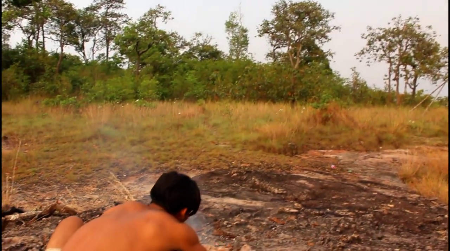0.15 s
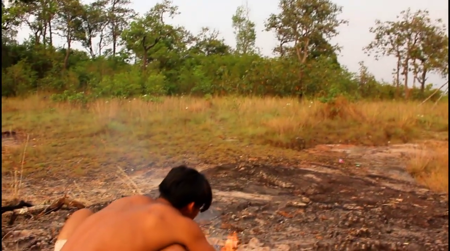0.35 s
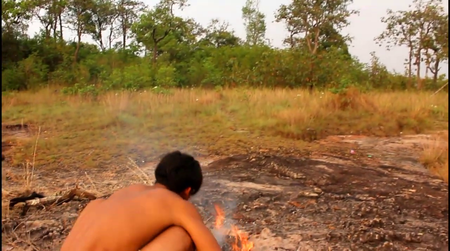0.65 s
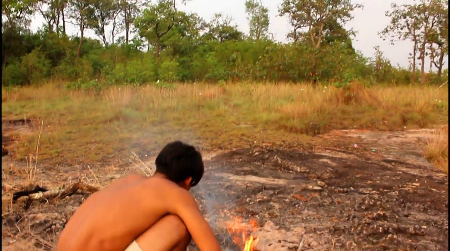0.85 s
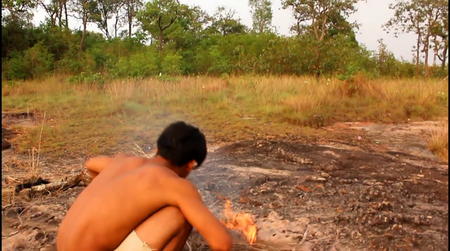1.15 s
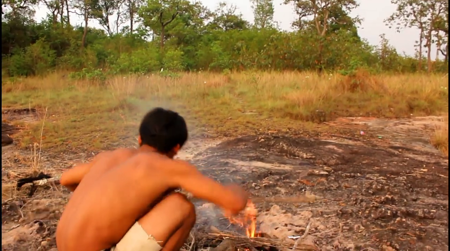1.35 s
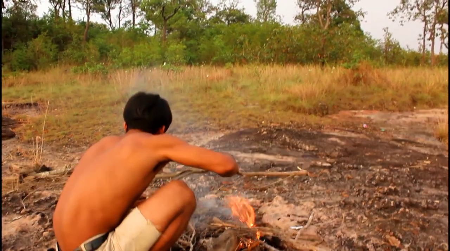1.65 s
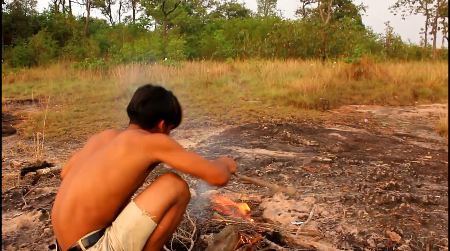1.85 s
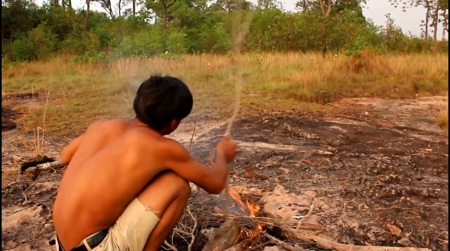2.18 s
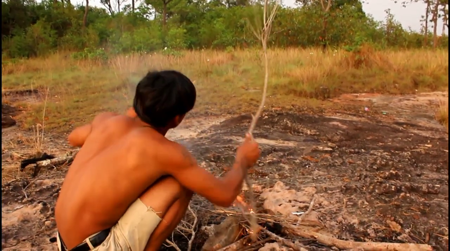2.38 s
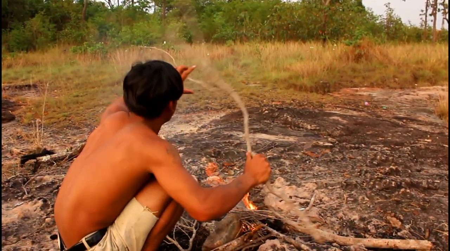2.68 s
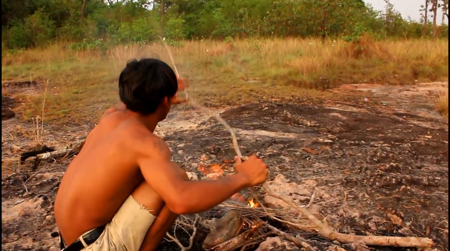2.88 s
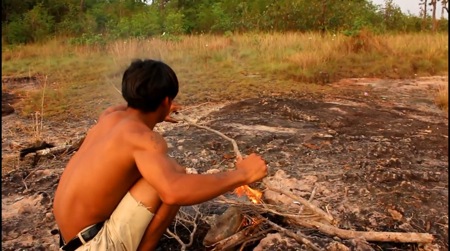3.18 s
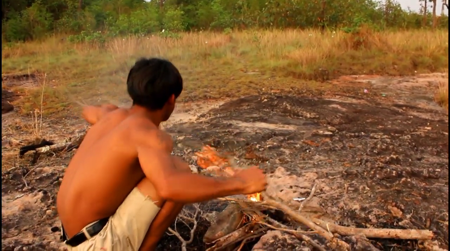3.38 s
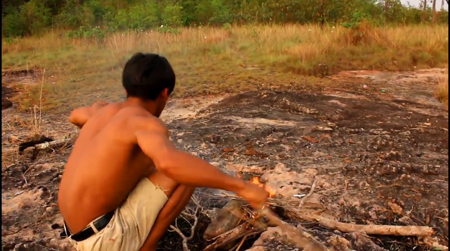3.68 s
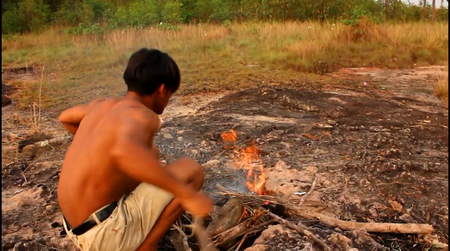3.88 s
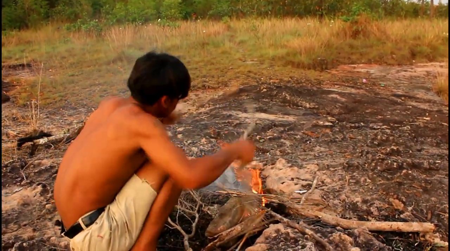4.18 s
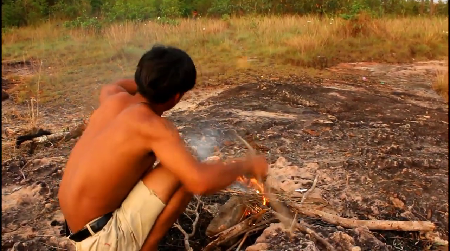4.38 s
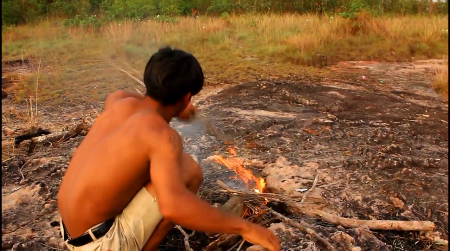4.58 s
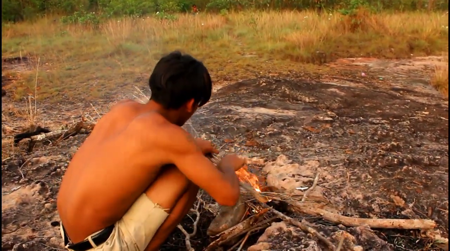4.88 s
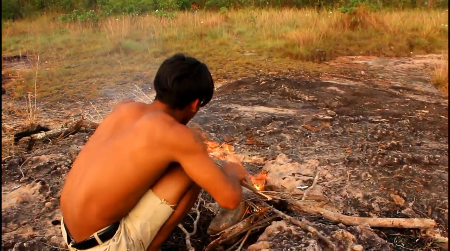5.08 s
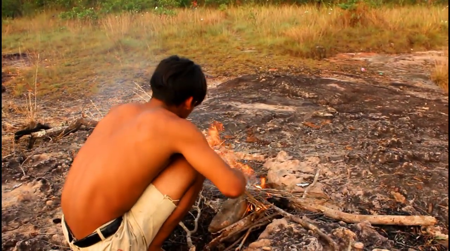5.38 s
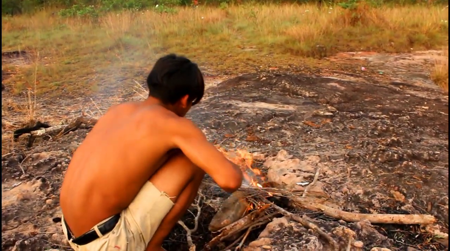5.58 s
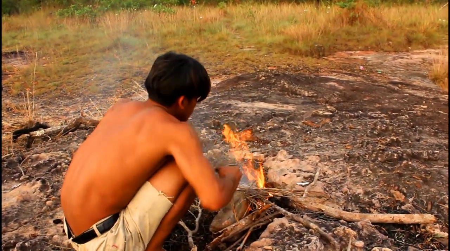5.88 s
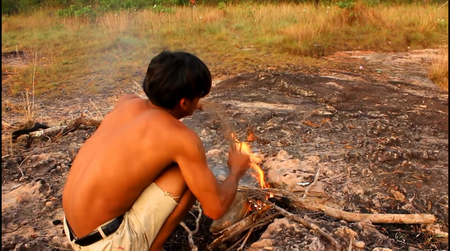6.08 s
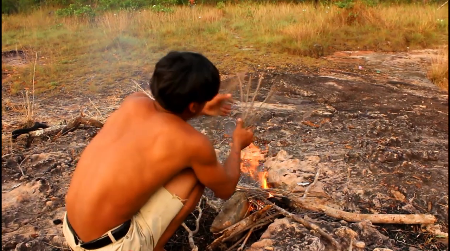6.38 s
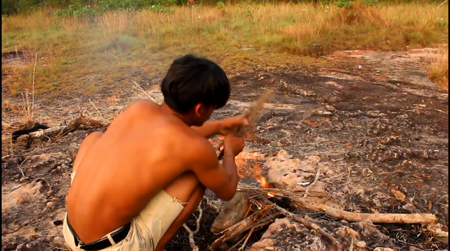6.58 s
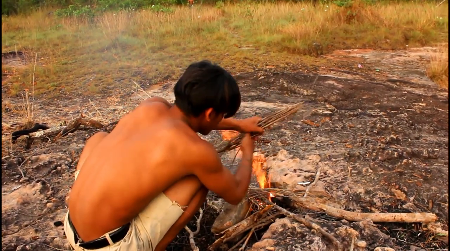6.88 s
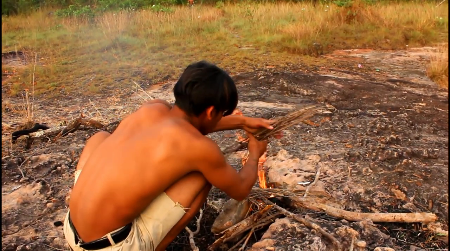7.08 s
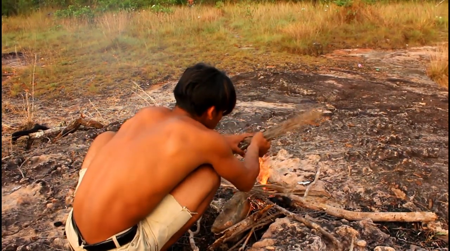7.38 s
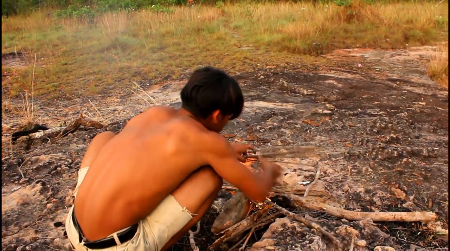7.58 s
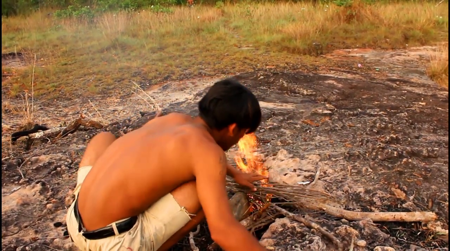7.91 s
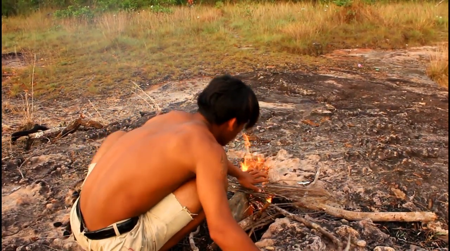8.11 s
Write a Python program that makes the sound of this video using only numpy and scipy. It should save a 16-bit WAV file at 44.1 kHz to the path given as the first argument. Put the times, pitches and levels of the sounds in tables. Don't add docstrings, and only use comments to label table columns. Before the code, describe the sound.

Close to the microphone in an open clearing, dry grass rustles in short scratchy strokes as burning blades tick, spit and fizz throughout. The first second is light crackle and rustle; around 1.3 s a thin, faint hiss of steam rises and fades. A crisp twig snap lands near 2 s, followed by smaller clicks and rustles, with a low wind thump at 3.2 s. At 3.9-4.0 s come splintering and two very loud, deep cracks, then a hollow branch split with knocks and wood dragging at 4.7-4.9 s. Rustling and small pops continue until a bright, hard splintering burst at 6.2 s, then lesser snaps and pings to 6.9 s. Grass swishes and flares carry on to the end past 8 s, with wind bumps near 7.3 and 8.2 s. Far off, a bird gives a quick high falling-note trill about every second, over steady faint insect hiss and a few very soft low dove coos before 4.4 s.

```python
import sys
import numpy as np
from scipy import signal
from scipy.io import wavfile
from scipy.ndimage import uniform_filter1d

SR = 44100
rng = np.random.default_rng(int(sys.argv[2]) if len(sys.argv) > 2 else 0)


def magnitude_from_level(level_db):
    exponent = np.asarray(level_db, float) / 20
    return 10 ** exponent


def bounce(signal):
    frames = np.transpose(np.atleast_2d(signal))
    limited = np.clip(frames, -1, 1)
    pcm = np.round(limited * 32767).astype(np.int16)
    wavfile.write(sys.argv[1], SR, pcm)


N = 363825


def evened(x):
    return x / np.sqrt(np.mean(x ** 2) + 1e-20)


def peaked(x):
    return x / np.sqrt(uniform_filter1d(x ** 2, 80).max())


def add(mix, start_s, sound):
    part = mix[max(round(start_s * SR), 0):][:len(sound)]
    part += sound[:len(part)]


def band(x, lo_hz, hi_hz, order=2):
    sos = signal.butter(order, [lo_hz, min(hi_hz, SR / 2.2)], "band", fs=SR, output="sos")
    return signal.sosfilt(sos, x)


def ring(x, hz, width_hz):
    r = np.exp(-np.pi * width_hz / SR)
    return signal.lfilter([1, 0, -1], [1, -2 * r * np.cos(2 * np.pi * hz / SR), r * r], x)


def drift(size):
    return evened(uniform_filter1d(uniform_filter1d(rng.standard_normal(N), size), size))


# frequency in Hz, density in dB per Hz.
AIR_SPECTRUM = [(12, -35), (20, -8), (70, 4.5), (140, 3), (219, 2), (504, -7), (856, -10), (1130, -11),
                (2030, -13), (4300, -15), (6170, -13), (7090, -24), (9900, -26), (13800, -38), (15400, -39)]


def air(level_db=-50):
    frames, hz = N // 256 + 5, np.fft.rfftfreq(1024, 1 / SR)
    real, imag, patches = rng.standard_normal((frames, 513, 3)).T
    patches_db = 1.4 * evened(uniform_filter1d(uniform_filter1d(patches, 10, 0), 10, 1))
    flutter_db = 3.4 * evened(uniform_filter1d(rng.standard_normal(frames), 6))
    f, db = np.transpose(AIR_SPECTRUM)
    colour_db = np.interp(np.log(hz + 1), np.log(f + 1), db)[:, None]
    bass = 1 / (1 + (hz[:, None] / 220) ** 2)
    spectra = (real + 1j * imag) * magnitude_from_level(colour_db + patches_db + bass * flutter_db)
    return magnitude_from_level(level_db) * evened(signal.istft(spectra, nperseg=1024, noverlap=768)[1][:N])


def insects(hz=6340, width_hz=610, level_db=-72.5):
    hiss = ring(rng.standard_normal(N), hz, width_hz)
    return magnitude_from_level(level_db) * evened(ring(hiss, hz, width_hz))


def swells(rows):
    t = np.arange(0, N, 32) / SR
    power = np.zeros(len(t))
    for peak_s, db, rise_s, fall_s in rows:
        drop_db = 10 * np.maximum((peak_s - t) / rise_s, (t - peak_s) / fall_s)
        power += magnitude_from_level(db - drop_db) ** 2
    return np.interp(np.arange(N) / SR, t, np.sqrt(power))


# peak in seconds, level in dB, seconds to rise 10 dB, to fall 10 dB.
STROKES = [(0, -38.5, .05, 0.14), (.873, -40, 0.02, 0.12), (1.043, -43.5, 0.07, .25), (1.33, -43, .12, .3),
           (1.98, -37, 0.12, .13), (2.282, -43.5, 0.06, .1), (2.6, -51, .2, .1), (2.91, -37.5, .06, .13),
           (3.09, -42.5, 0.06, .2), (3.385, -45, .15, .09), (3.625, -42, .015, 0.14),
           (3.91, -39, .18, 0.22), (4.141, -37, 0.1, 0.12), (4.225, -36, .12, 0.08), (4.742, -35, 0, 0.04),
           (5.036, -40, 0.05, 0.47), (5.45, -42, .4, .3), (5.88, -46, .5, 0.1), (6.204, -26, .005, .015),
           (6.255, -38, .015, 0.08), (6.356, -42.5, .05, 0.1), (6.54, -35, .1, 0.07),
           (6.7, -36.5, .037, 0.14), (6.95, -47.5, 0.1, 0.14), (7.129, -46, .08, .1),
           (7.421, -41, 0.05, .09), (7.575, -41.5, .1, .06), (7.93, -41, 0.12, .07),
           (8.165, -39.5, .07, .3)]
# peak in seconds, level in dB, seconds to rise 10 dB, to fall 10 dB.
FLARES = [(0, -52, .05, 0.045), (.808, -49, .1, .1), (1.043, -40, 0.044, 0.091), (1.424, -40.5, .012, 0.06),
          (1.69, -39, .03, .04), (2.86, -44, .06, .05), (2.282, -38.5, .03, 0.076), (2.457, -46, .15, .12),
          (3.97, -41, .05, .3), (4.155, -36, .1, .15), (5.06, -42, .05, .22), (5.45, -49, .3, .04),
          (5.92, -47, .2, .04), (6.079, -49, .1, .045), (6.345, -40, .03, .037), (6.54, -35, .07, .055),
          (6.7, -42, .045, .1), (7.129, -37, 0.033, 0.084), (7.54, -44, .06, .08), (7.92, -38, .05, .07),
          (8.154, -44, 0.037, .03)]
# peak in seconds, level in dB, seconds to rise 10 dB, to fall 10 dB.
DRAGS = [(.15, -46, .3, .3), (.873, -48, .02, 0.018), (4.31, -34, .04, .06), (4.742, -33, 0.0072, .02),
         (4.83, -36.5, 0.046, 0.068), (6.19, -28.5, .003, .007), (5.15, -49, .1, .1), (7.27, -54, 0.34, .3),
         (7.421, -42, 0.045, 0.083), (7.897, -45, .04, 0.14)]
# start in seconds, length in seconds, level in dB.
SWIPES = [(0.864, 0.033, -43.5), (1.883, .06, -39), (5.184, 0.026, -35), (7.095, .085, -47),
          (7.385, 0.1, -39), (7.835, 0.15, -42.5)]


def grass(snaps_per_s=600, spread_db=3.5, clump_db=1.0, stalk_count=28):
    body = swells(STROKES)
    wood = np.hypot(swells(DRAGS), magnitude_from_level(-15) * body)
    fizz = np.hypot(swells(FLARES), magnitude_from_level(-21) * body)
    swipes = np.zeros(N)
    for start_s, length_s, db in SWIPES:
        add(swipes, start_s, magnitude_from_level(db) * signal.windows.tukey(round(length_s * SR), .25))

    clumps = magnitude_from_level(clump_db * drift(size=300))
    sizes = magnitude_from_level(spread_db * np.minimum(rng.exponential(1, N), 4))
    hits = sizes * (rng.random(N) < snaps_per_s * clumps / SR)
    puffs = signal.lfilter([1], [1, -np.exp(-1 / (0.0018 * SR))], hits)
    grains = evened((evened(puffs) + 0.7) * clumps * rng.standard_normal(N))

    touch = evened(uniform_filter1d(rng.standard_normal((stalk_count, N // 441 + 1)), 5, 1))
    touched = magnitude_from_level(4.5 * touch).repeat(441, 1)[:, :N]
    stalks_hz = np.geomspace(2000, 8000, stalk_count)
    stalks = sum(evened(ring(grains * on, hz, 95)) for on, hz in zip(touched, stalks_hz))

    scrape = evened(band(grains, 2300, 6500)) + magnitude_from_level(1.5) * evened(stalks)
    hollow = ring(band(grains, 620, 1050), hz=840, width_hz=170)
    crisp = band(band(grains, 5800, 15500), 3000, 6500, order=1)
    out = magnitude_from_level(-4.5) * np.hypot(body, swipes) * evened(scrape)
    out += magnitude_from_level(-5.0) * wood * evened(hollow)
    return out + magnitude_from_level(-11.5) * np.hypot(fizz, 0.51 * swipes) * evened(crisp)


def ticks(ticks_per_s=260, level_db=-21, t60_s=.012, ember_db=-53, blade_count=12):
    sizes = magnitude_from_level(3.8 * np.minimum(rng.exponential(1, N), 4)) * (rng.random(N) < ticks_per_s / SR)
    blade = rng.integers(0, blade_count, N)
    t, out = np.arange(1500) / SR, np.zeros(N)
    for k, hz in enumerate(np.geomspace(2500, 6500, blade_count)):
        tick = band(rng.standard_normal(len(t)) * magnitude_from_level(-60 * t / t60_s), 0.69 * hz, 1.48 * hz)
        out += signal.oaconvolve(sizes * (blade == k), tick)[:N]
    stirred = magnitude_from_level(ember_db) + np.hypot(swells(STROKES), swells(FLARES))
    return magnitude_from_level(level_db) * stirred * evened(out)


def crackle(rows, t60_s, wide):
    out, t = np.zeros(N), np.arange(2000) / SR
    for (peak_s, db, hz), noise in zip(rows, rng.standard_normal((len(rows), len(t)))):
        puff = noise * (1 - np.exp(-t / .0004)) * magnitude_from_level(-60 * t / t60_s)
        tick = peaked(band(puff, hz / wide, hz * wide)) + .6 * peaked(ring(puff, hz, .08 * hz))
        add(out, peak_s - .0006, magnitude_from_level(db) * peaked(tick))
    return out


# time in seconds, peak in dB, ring in Hz.
SPARKS = [(0.0454, -44.0, 7900), (0.7683, -56.0, 7750), (0.9072, -47.5, 7390), (1.0265, -45.5, 7900),
          (1.0335, -44.0, 8070), (1.0993, -48.0, 7020), (1.5074, -46.5, 8630), (1.6947, -45.5, 9020),
          (1.7331, -51.5, 8050), (1.7456, -47.0, 8330), (1.8052, -51.0, 8550), (1.8444, -51.5, 8050),
          (2.0519, -50.0, 8120), (2.3497, -50.5, 8590), (2.4423, -52.5, 7750), (2.4475, -52.5, 7190),
          (2.4764, -53.0, 8590), (2.5084, -52.0, 8830), (2.5288, -49.0, 11300), (2.8042, -51.5, 7320),
          (3.0918, -42.0, 8510), (3.2971, -54.5, 9880), (3.3736, -47.0, 7770), (3.772, -51.0, 8140),
          (3.8106, -49.0, 7450), (3.8655, -46.5, 10120), (3.9511, -15.5, 7490), (4.3956, -53.5, 9370),
          (4.513, -50.0, 8100), (4.7942, -26.0, 8310), (4.9825, -42.0, 8250), (5.4142, -45.5, 7020),
          (5.514, -42.5, 8660), (5.7699, -49.5, 7130), (5.8615, -48.5, 8590), (5.9218, -49.5, 8570),
          (6.0411, -49.5, 9880), (6.2037, -20.0, 7970), (6.2823, -41.5, 9650), (6.3806, -43.5, 7820),
          (6.4402, -49.5, 7840), (6.4501, -34.5, 10510), (6.6507, -52.5, 9710), (6.7871, -41.0, 7210),
          (6.9188, -49.5, 7430), (6.9685, -45.5, 7970), (7.176, -47.5, 12420), (7.2588, -48.0, 7860),
          (7.4726, -44.5, 8940), (7.5459, -43.5, 7920), (7.6282, -49.0, 10010), (7.7387, -54.0, 8380),
          (7.7901, -48.0, 8310), (7.8208, -53.0, 7040), (8.0515, -52.0, 9540), (8.0899, -53.5, 8910),
          (8.1308, -43.5, 9280), (8.156, -43.0, 8870)]


def sparks():
    return crackle(SPARKS, t60_s=.02, wide=1.75)


# time in seconds, peak in dB, ring in Hz.
STALKS = [(0.0459, -33.0, 2050), (0.3136, -45.5, 3900), (0.338, -49.5, 3060), (1.034, -44.0, 3250),
          (1.4136, -42.0, 2780), (1.4276, -43.0, 3900), (1.5593, -50.0, 3900), (2.0521, -45.0, 3790),
          (2.3021, -46.0, 3830), (2.3507, -50.0, 2820), (2.5572, -50.0, 3900), (2.5862, -48.5, 3900),
          (2.6346, -49.0, 3140), (2.9167, -33.5, 3570), (2.9466, -40.5, 2910), (3.0713, -41.5, 3900),
          (3.0803, -40.5, 3060), (3.2841, -41.5, 3700), (3.2966, -42.0, 3270), (3.3741, -43.5, 3060),
          (3.55, -48.5, 1850), (3.6325, -41.0, 2840), (3.6453, -42.5, 3420), (3.7134, -43.0, 2410),
          (3.7722, -46.5, 2560), (3.961, -23.0, 3620), (4.1451, -25.5, 3900), (4.3175, -43.0, 3530),
          (4.5767, -51.5, 2710), (4.6517, -53.0, 3340), (4.7385, -31.0, 3100), (5.1089, -41.0, 3680),
          (5.4137, -41.5, 3750), (5.5821, -43.5, 2650), (5.6417, -41.5, 3550), (5.6477, -43.5, 2800),
          (5.7011, -44.0, 2280), (5.7203, -42.0, 3550), (5.863, -45.5, 2970), (5.9211, -45.0, 3470),
          (6.0413, -46.5, 1890), (6.3486, -42.5, 3550), (6.3663, -39.0, 3550), (6.4883, -36.0, 2200),
          (6.8562, -39.5, 2200), (6.9428, -45.0, 2370), (7.2167, -49.0, 3040), (7.2586, -50.5, 3900),
          (7.4117, -33.5, 2280), (7.4708, -40.5, 2970), (7.4793, -42.5, 3040), (7.5858, -38.0, 3790),
          (7.628, -46.0, 2450), (7.6352, -47.5, 2370), (7.739, -46.0, 2990), (7.8764, -39.5, 2450),
          (8.0827, -47.0, 3900), (8.157, -42.0, 2430)]


def stalk_clicks():
    return crackle(STALKS, t60_s=.028, wide=1.9)


# frequency in Hz, width in Hz, level in dB.
BRANCH_MODES = [
    (304, 87, -14),
    (867, 250, 7.5),
    (1608, 110, 4),
]


def crack(db, hz, t60_s, noise, fibres, thump_db, knock_db, edge_db, rise_s, tear_db):
    t = np.arange(len(noise)) / SR
    burst = magnitude_from_level(-60 * (t / t60_s) ** 0.8) + magnitude_from_level(-35.5 - 60 * t / (0.53 * t60_s + 0.0244))
    onset = 1 - np.exp(-(t / rise_s) ** 1.3)
    tears = noise * (0.51 + uniform_filter1d(fibres ** 6, 24) * 4.9) * onset * burst

    body = band(tears, max(.5 * hz, 1700), 1.3 * hz + 1500)
    others_hz = np.minimum(hz * (.6 + fibres[:4]), 12000)
    scatter = sum(ring(tears, f, 150 + .05 * f) for f in others_hz)
    tone = ring(tears, hz, 110 + .03 * hz) + .45 * magnitude_from_level(tear_db) * scatter
    thump = band(band(tears, 600, 2100, order=1), 350, 9000, order=1)
    knock = sum(magnitude_from_level(g) * peaked(ring(tears, f, w)) for f, w, g in BRANCH_MODES)
    edge = band(band(tears, 6000, 15500), 3000, 7500, order=1)
    edge = edge * magnitude_from_level(np.maximum(-60 * .25 * t / t60_s, -12))

    mix = np.interp(db, [-35, -10], [.4, .9]) * magnitude_from_level(tear_db) * peaked(body)
    mix = mix + np.interp(db, [-35, -10], [.85, .4]) * peaked(tone)
    mix = mix + magnitude_from_level(thump_db) * peaked(thump)
    mix = mix + magnitude_from_level(knock_db - 0.5) * peaked(band(knock, 200, 2300))
    return magnitude_from_level(db) * (mix + magnitude_from_level(edge_db - 0.5) * peaked(edge))


def wood(rows, thump_db, knock_db, edge_db, rise_s=.0005, tear_db=0):
    out = np.zeros(N)
    noises, fibres = rng.standard_normal((len(rows), 5000)), rng.random((len(rows), 5000))
    for (peak_s, db, hz, t60_s), noise, fibre in zip(rows, noises, fibres):
        sound = crack(db, hz, t60_s, noise, fibre, thump_db, knock_db, edge_db, rise_s, tear_db)
        add(out, peak_s - .0006, sound)
    return out


# time in seconds, peak in dB, ring in Hz, t60 in seconds.
BREAKS = [(.047, -35, 2070, 0.011), (.123, -43, 3830, .046), (.1826, -42, 6550, 0.023),
          (.3676, -43, 2000, .04), (.955, -40, 1430, .056), (.9611, -35.5, 3240, 0.046),
          (2.6908, -39, 2870, .064), (4.127, -27, 3630, .03), (4.2891, -39, 6070, .038),
          (4.5002, -42, 2510, .03), (4.7927, -14, 2260, .05), (4.9812, -30, 2500, 0.046),
          (5.0198, -32.5, 5630, 0.12), (5.1293, -38.5, 4250, 0.048), (7.4117, -39, 2340, .12),
          (7.875, -39, 1490, 0.068), (8.2154, -32.5, 2480, .023)]


def breaks():
    return wood(BREAKS, thump_db=-20, knock_db=-3, edge_db=-24)


# centre in seconds, level in dB, wobble in Hz, length in seconds.
GUSTS = [(0.417, -41, 83.5, 0.016), (0.454, -39, 68.5, 0.017), (0.765, -38.5, 96, 0.016),
         (2.602, -41.5, 108, 0.013), (2.648, -45, 58, 0.12), (3.106, -41, 62.6, 0.025),
         (3.192, -31.5, 86, 0.034), (3.239, -20, 135, 0.022), (3.296, -27.5, 97, 0.021),
         (3.467, -42.5, 61.3, 0.035), (3.605, -44, 99, 0.028), (4.13, -41.5, 232, 0.0088),
         (4.212, -36.5, 76, 0.016), (4.443, -35.5, 69.4, 0.038), (4.582, -32, 64, 0.0066),
         (4.603, -41, 69, 0.01), (4.802, -38, 222, 0.014), (5.296, -43, 66, 0.093),
         (6.149, -37.5, 78, 0.011), (6.727, -44, 115, 0.027), (6.956, -32.5, 92, 0.019),
         (7.015, -41, 74.6, 0.032), (7.111, -41, 52.3, 0.01), (7.157, -41, 71.4, 0.046),
         (7.266, -25.5, 89, 0.027), (7.503, -37, 55, 0.069), (7.571, -41.5, 55, 0.028),
         (8.089, -44, 70, 0.064), (8.174, -30.5, 125.5, 0.049), (8.21, -38, 42, 0.04)]


def wind():
    out = np.zeros(N)
    for (centre_s, db, hz, length_s), (turn, bend) in zip(GUSTS, rng.random((len(GUSTS), 2))):
        t = np.arange(-2 * length_s, 2 * length_s, 1 / SR)
        phase = 2 * np.pi * (hz * t * (1 + 21.0 * (bend - .5) * t) + turn)
        wobble = np.cos(phase) + 0.37 * np.cos(1.59 * phase + 6 * bend) + 0.64 * np.cos(0.62 * phase)
        add(out, centre_s - 2 * length_s, magnitude_from_level(db) * np.exp(-2.8 * (t / length_s) ** 2) * wobble)
    return out


NOTE_COUNT, MAIN_NOTE = 12, 10


def trill(lead_db):
    k = np.arange(NOTE_COUNT)
    ease = 1 / (1 + np.exp((6.7 - k) / .9))
    gap_s = .035 + .025 * ease
    start_s = np.cumsum(gap_s) - gap_s
    swell_db = (-6.5 + lead_db) * (1 - ease)
    db = swell_db + .3 * (k - MAIN_NOTE) - 7 * (k > MAIN_NOTE)
    return zip(start_s - start_s[MAIN_NOTE], db, .8 * gap_s)


# main note in seconds, level in dB, relative lead-in level in dB.
SONGS = [(1.036, -41.5, 0), (2.18, -43, -1), (3.315, -42.5, -1), (4.402, -44, -2), (5.652, -39.5, -4),
         (6.665, -39, -5), (7.796, -39.5, -5)]


def bird(note_hz=6080, fall_hz=1050):
    out = np.zeros(N)
    for main_s, song_db, lead_db in SONGS:
        for (s, db, length_s), off in zip(trill(lead_db), rng.standard_normal(NOTE_COUNT)):
            u = np.arange(-.5, .5, 1 / (SR * length_s))
            hz = note_hz * (1 + .006 * off) - fall_hz * (u + u ** 3)
            note = signal.windows.tukey(len(u), .8) * np.sin(2 * np.pi * np.cumsum(hz) / SR)
            add(out, main_s + s - length_s / 2, magnitude_from_level(song_db + db) * note)
    t = np.arange(SR // 4) / SR
    sparse = rng.standard_normal(len(t)) * (rng.random(len(t)) < .02)
    trees = sparse * magnitude_from_level(-60 * t / 0.74) * (t > .006)
    out = out * magnitude_from_level(2.5 * drift(size=120))
    return out + magnitude_from_level(-9) * signal.fftconvolve(out, trees / np.linalg.norm(trees))[:N]


# time in seconds, peak in dB, ring in Hz, t60 in seconds.
SNAPS = [(.806, -47.5, 9700, .017), (1.9305, -30, 3940, .035), (1.9632, -19, 4380, 0.061),
         (1.9995, -34, 4000, .063), (2.9082, -39, 3480, 0.21), (2.9866, -45, 3040, .12),
         (3.0978, -39, 3900, 0.033), (3.431, -45, 3400, .041), (3.9784, -41.5, 3660, .065),
         (3.9997, -27.5, 2150, .014), (4.1002, -31.5, 7770, 0.036), (4.1977, -35, 3100, .075),
         (4.774, -26, 4100, 0.039), (5.5654, -31.5, 2600, .037), (5.818, -26, 4800, 0.033),
         (6.0002, -28.5, 6030, .033), (6.192, -15, 5000, .017), (6.2035, -16, 4800, 0.038),
         (6.4493, -32.5, 6040, .067), (6.552, -32.5, 7110, .051), (6.661, -28, 4820, .035)]


def snaps():
    return wood(SNAPS, thump_db=-24, knock_db=-22.5, edge_db=-8.5)


# time in seconds, level in dB.
STEAM = [
    (1.0, -69.5),
    (1.2, -60.5),
    (1.33, -52),
    (1.5, -62.5),
    (1.6, -68),
]
# frequency in Hz, width in Hz, level in dB.
VENT = [
    (8700, 600, 0),
    (9400, 300, -3),
    (9600, 1800, -4),
    (10900, 500, -7),
]


def steam():
    s, db = np.transpose(STEAM)
    jet = rng.standard_normal(N)
    push = magnitude_from_level(np.interp(np.arange(N) / SR, s, db, -120, -120) + 2.1 * drift(size=400))
    return push * sum(magnitude_from_level(g) * evened(ring(jet, f, w)) for f, w, g in VENT)


# start in seconds, length in seconds, level in dB.
COOS = [
    (1.07, .1, -54),
    (2.103, 0.3, -56.5),
    (2.885, 0.25, -57),
    (4.139, 0.2, -57),
]


def dove(coo_hz=343):
    out = np.zeros(N)
    for start_s, length_s, db in COOS:
        t = np.arange(0, length_s, 1 / SR)
        hz = coo_hz * (1 + 0.183 * np.exp(-t / 0.0377))
        coo = signal.windows.tukey(len(t), .4) * np.sin(2 * np.pi * np.cumsum(hz) / SR)
        add(out, start_s, magnitude_from_level(db) * coo)
    return out


# time in seconds, peak in dB, ring in Hz, t60 in seconds.
POPS = [(1.327, -42, 8100, .08), (1.414, -35, 8000, .07), (3.4202, -47, 2770, .038),
        (3.592, -37.5, 2320, .045), (4.1444, -24, 4800, .024), (4.9452, -33, 2780, .041),
        (5.0302, -40, 5070, .11), (5.4627, -40, 5060, .049), (5.719, -42.5, 5500, .032),
        (5.7804, -39.5, 4420, .036), (5.965, -35, 3780, 0.051), (6.0309, -43, 5170, .032),
        (6.3655, -40, 5500, .027), (6.858, -37, 6500, .011), (6.933, -42.5, 2860, .035),
        (8.203, -34.5, 3080, .024)]


def pops():
    return wood(POPS, thump_db=-15, knock_db=-23, edge_db=-23)


# time in seconds, peak in dB, ring in Hz.
AFTERS = [(4.8075, -19, 1650), (4.809, -23, 2700), (4.8585, -29, 860), (4.859, -30, 1500),
          (5.0195, -35, 2700), (6.1925, -27, 880), (6.1928, -20, 2600), (6.193, -27, 1500),
          (6.194, -20, 8500), (6.2125, -27, 2800), (6.213, -26, 4600), (6.2135, -29, 8000),
          (6.449, -39, 2300), (6.551, -39, 2000), (5.565, -38, 7500), (6.68, -33, 4500), (1.62, -56, 500),
          (1.69, -56, 480)]


def after_rings():
    return crackle(AFTERS, t60_s=.07, wide=1.35)


# time in seconds, peak in dB, ring in Hz, t60 in seconds.
SPLINTERS = [(1.7635, -39.5, 4780, .03), (1.974, -37, 5030, .07), (2.084, -45.5, 2950, .067),
             (3.9046, -15, 3800, .033), (3.961, -24, 3600, 0.024), (4.2703, -40, 4930, 0.028),
             (5.154, -38.5, 9500, .02), (5.9456, -36, 2500, .033), (5.973, -44, 9000, .014),
             (6.136, -50, 8660, .022), (6.1878, -10.5, 4370, 0.017), (6.2361, -31, 2150, .15),
             (6.4855, -34, 5170, .036), (6.6807, -33.5, 3600, .09), (6.7127, -23, 3660, .028),
             (6.9493, -45, 5140, .032), (7.5855, -39, 4900, .026), (8.1383, -44.5, 6800, 0.029),
             (8.1764, -34.5, 3500, 0.019)]


def splinters():
    return wood(SPLINTERS, thump_db=-25, knock_db=-22.5, edge_db=2)


# time in seconds, peak in dB, ring in Hz, t60 in seconds.
PINGS = [(2.1573, -35.5, 3950, .04), (6.7868, -32, 3700, .03), (6.881, -38, 3750, .12),
         (3.8755, -36, 2710, .04), (3.914, -32, 2900, .08), (6.888, -37, 3750, .1),
         (3.9065, -19, 3750, .04)]


def pings():
    return wood(PINGS, thump_db=-22, knock_db=-24, edge_db=-25, rise_s=.0012, tear_db=-15)


# time in seconds, peak in dB, ring in Hz, t60 in seconds.
KNOCKS = [
    (2.585, -57, 1520, 0.045),
    (4.737, -39, 3680, .044),
    (4.8671, -42.5, 2890, 0.055),
]


def knocks():
    return wood(KNOCKS, thump_db=-20, knock_db=10.6, edge_db=-20, rise_s=.0006)


# time in seconds, peak in dB, ring in Hz, t60 in seconds.
CRACKS = [
    (3.9495, -8, 3700, .02),
    (4.0218, -6, 4000, .018),
]


def green_cracks():
    return wood(CRACKS, thump_db=-15, knock_db=-30, edge_db=-18, rise_s=.0025)


# time in seconds, peak in dB, ring in Hz, t60 in seconds.
THUDS = [
    (4.7268, -24, 2400, .03),
    (4.8565, -24, 2500, .026),
    (6.894, -36, 3000, .02),
    (4.846, -40, 2600, .02),
]


def thuds():
    return wood(THUDS, thump_db=-14, knock_db=-5, edge_db=-28, rise_s=.002)


# time in seconds, peak in dB, ring in Hz, t60 in seconds.
SPLITS = [
    (4.8058, -17, 4300, .06),
    (4.822, -28.5, 4130, .018),
    (4.7798, -26, 4240, .035),
]


def splits():
    return wood(SPLITS, thump_db=-18, knock_db=-8, edge_db=-8, rise_s=.0006)


def scene():
    fire = grass() + ticks() + sparks() + stalk_clicks() + after_rings() + steam()
    twigs = breaks() + snaps() + pops() + splinters() + pings()
    twigs = twigs + knocks() + green_cracks() + thuds() + splits()
    around = air() + insects() + wind() + bird() + dove()
    return (fire + twigs + around)[None]


def roll_off(x):
    return signal.sosfilt(signal.butter(12, 16420, fs=SR, output="sos"), x)


def record(dry):
    noisy = np.clip(dry + magnitude_from_level(-68) * rng.standard_normal(N), -1, 1)
    lowpass = signal.firwin(401, 15600, window=("kaiser", 4), fs=SR)
    limited = signal.oaconvolve(noisy, lowpass[None], "same")
    return roll_off(np.clip(limited, -1, 1))


dry = scene()
out = record(dry)
bounce(out)
```